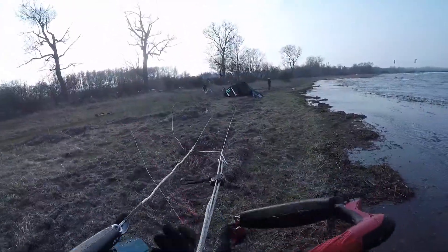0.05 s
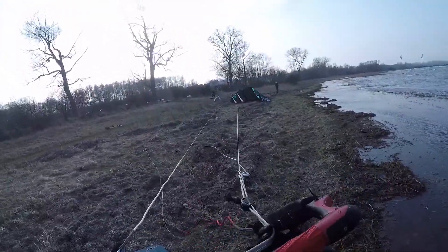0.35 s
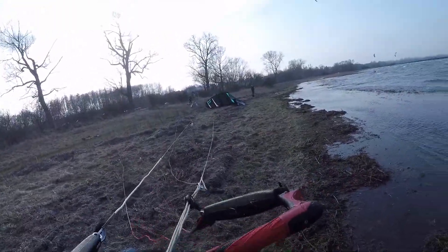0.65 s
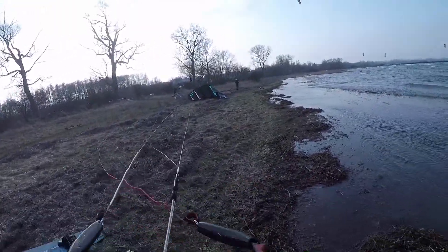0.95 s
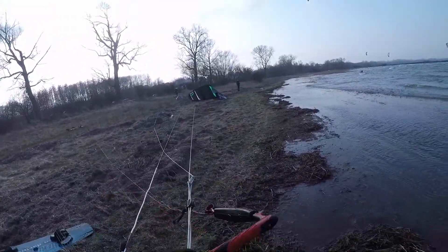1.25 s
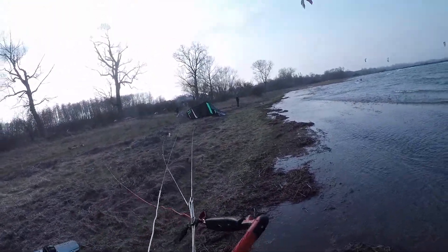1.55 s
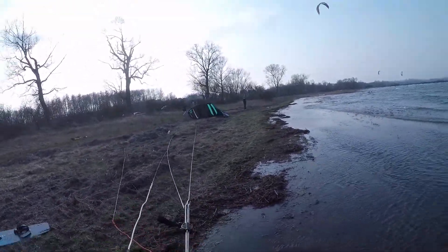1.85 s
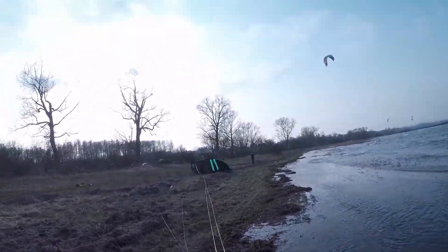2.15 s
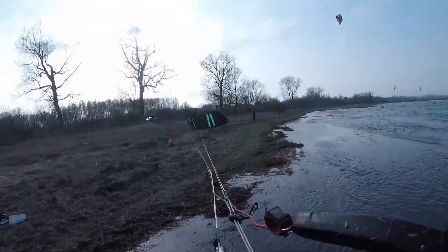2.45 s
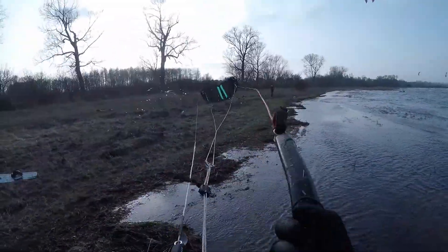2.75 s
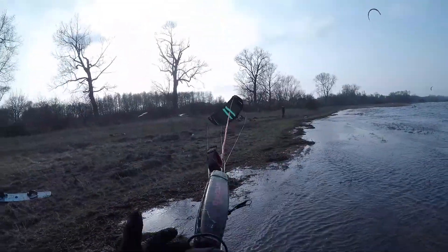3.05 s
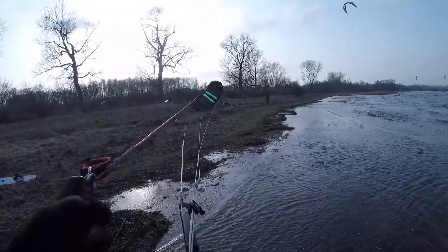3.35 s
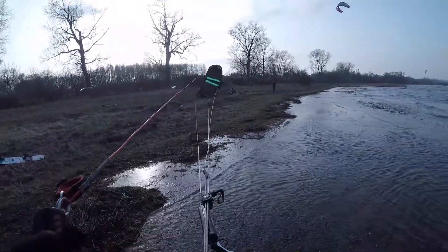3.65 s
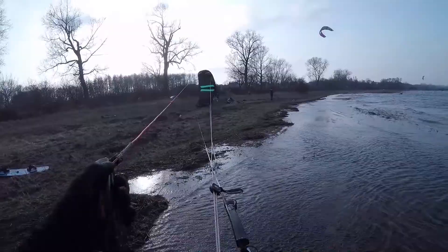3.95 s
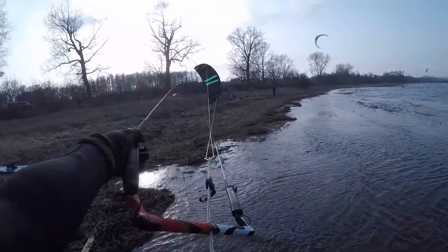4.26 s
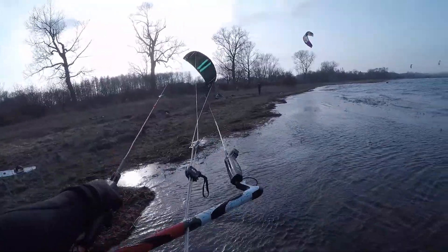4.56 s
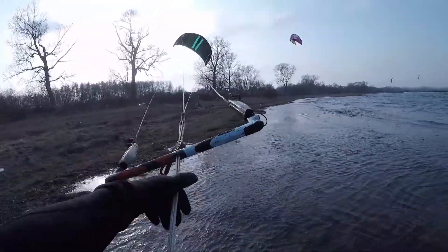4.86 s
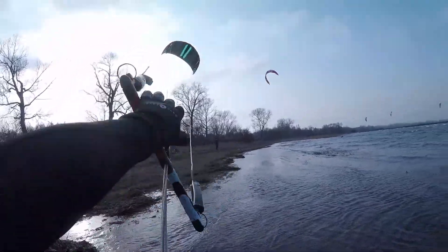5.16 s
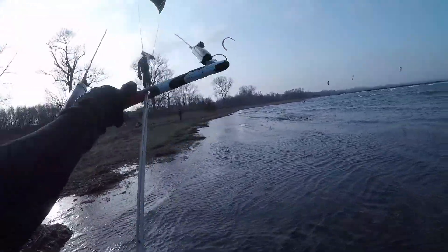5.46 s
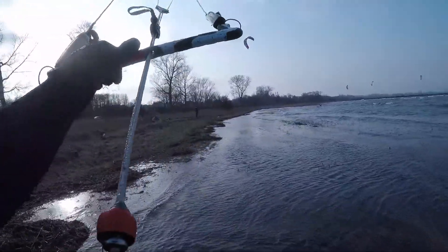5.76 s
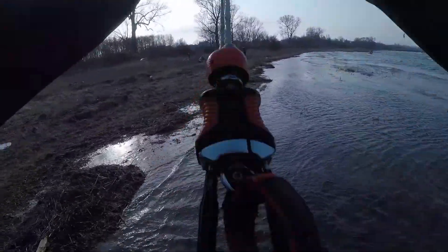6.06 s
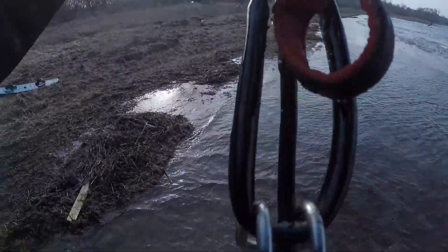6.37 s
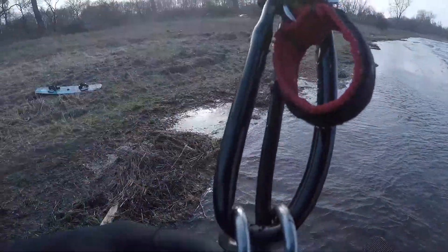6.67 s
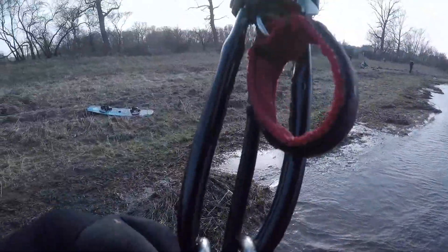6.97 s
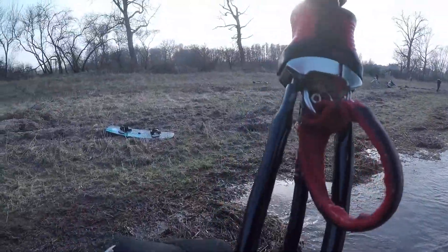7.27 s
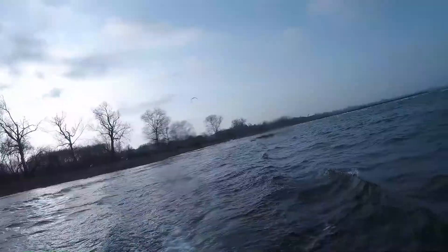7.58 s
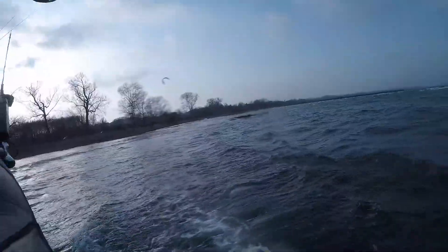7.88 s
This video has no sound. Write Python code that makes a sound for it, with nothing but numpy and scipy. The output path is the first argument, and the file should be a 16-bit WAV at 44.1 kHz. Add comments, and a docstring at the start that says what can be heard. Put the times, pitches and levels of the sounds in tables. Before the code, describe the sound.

Low wind buffets a body-worn microphone throughout, over a faint, steady wash of small lake waves. For the first two seconds, gusts thump amid light glove scrapes and small clicks of kite gear. The strongest gust hits at about 2.3 seconds with a knock and a scrape, and everything briefly dips in level. From 2.7 to 5.6 seconds, kite lines softly creak and rasp through the control bar while fittings and metal clasps tick. At 4.8 seconds the bar gives a sharp, loud click with a deep thud. Between 6.2 and 6.9 seconds a glove rubs the camera, with several dull knocks. The harness hook clicks sharply at 7 seconds, and its loop squeaks twice, briefly, around 7.3 and 7.5. At 7.6 seconds a sudden pop brings in fine spray off a board, which runs with the wind until the end, just after 8 seconds.

```python
"""Kitesurfer on a windy lake shore

Gusts buffet a body-worn camera's microphone over the wash of small waves. Lines rasp and creak on
the control bar, fittings click, a glove scrapes the housing and the harness loop squeaks on its hook.
The strongest gust makes the camera's gain duck. With a pop the scene cuts to a ride through spray."""
import sys
import numpy as np
from scipy import signal
from scipy.fft import rfft, irfft, next_fast_len
from scipy.io import wavfile
from scipy.ndimage import uniform_filter1d, minimum_filter1d

SR = 44100
rng = np.random.default_rng(int(sys.argv[2]) if len(sys.argv) > 2 else 0)


def store_pcm(level_fs):
    """Save levels as 16-bit WAV."""
    pcm = np.round(np.clip(level_fs, -1, 1) * 32767).astype(np.int16)
    wavfile.write(sys.argv[1], SR, np.atleast_2d(pcm).T)


N = 358091
T = np.arange(N) / SR
TOP_HZ = 15300  # upper edge of the camera's sound

# Levels are relative within each layer. Spectra are EQ curves for the raw sound.
# gusts thumping the microphone: peak t/s, length/s, level/dB
GUSTS = [(0.193, 0.096, -13), (0.844, 0.07, -10.5), (1.012, 0.041, -19), (1.217, 0.057, -10.5),
         (1.577, 0.047, -18.5), (1.684, 0.065, -13.5), (1.779, 0.034, -11), (2.14, 0.15, -15.5),
         (2.288, 0.068, 0), (2.676, 0.12, -5), (3.08, 0.076, -8), (3.256, 0.048, -10), (3.61, 0.062, -13),
         (4.004, 0.071, -14), (4.275, 0.063, -14), (4.92, 0.082, -16.5), (5.064, 0.067, -14.5),
         (5.235, 0.08, -13), (5.95, 0.035, -14.5), (6.253, 0.056, -15.5), (7.02, 0.1, -14.5),
         (7.17, 0.1, -21)]
# pressure swings of the breeze between gusts: t/s, level/dB
BREEZE_LEVEL = [(0, -16), (.35, -31.5), (.53, -35.5), (.74, -33.5), (1.0, -24), (2.2, -26), (2.47, -27),
                (2.8, -21.5), (3.5, -26), (3.82, -26.5), (4.1, -28.5), (5.3, -24), (6.7, -27.5), (7.6, -23),
                (8.05, -22)]
# turbulence at the housing as the body turns in the wind: t/s, level/dB
TURBULENCE_LEVEL = [(0, -33.5), (.72, -33), (1.2, -38.5), (1.65, -34), (1.95, -37), (2.2, -33.5),
                    (2.42, -37), (2.65, -34), (2.8, -34), (3.25, -35.5), (3.58, -35.5), (3.9, -42.5),
                    (4.35, -35), (4.65, -42), (5.1, -37.5), (5.85, -41.5), (6.15, -33.5), (6.4, -41.5),
                    (6.6, -33), (6.83, -48), (6.91, -31.5), (6.99, -47), (7.2, -38.5), (8.1, -50)]
# deep heave of large eddies, and rush of small ones: f/Hz, level/dB
HEAVE_SPECTRUM = [(4, 2.5), (12, -7), (25, 6.5), (34, -4), (43, -10.5), (58, -39), (120, -61)]
EDDY_SPECTRUM = [(35, -0.5), (60, 1), (85, 4), (130, -1.5), (200, -7), (320, -15), (520, -24.5),
                 (900, -29.5), (2000, -34.5), (4000, -59.5)]

# clicks of bar fittings, harness hook and buckles, and small metal line clasps:
# t/s, level/dB, contact time/ms, main mode boost/dB
BAR_CLICKS = [(1.220, -37.5, .1, -2), (3.065, -41, .15, 2), (3.218, -32, .15, 4), (3.397, -32, 0.072, -6),
              (3.569, -34, 0.18, 9), (4.645, -33, 0.063, 3), (4.7833, -14, 0.077, -9.5),
              (4.7856, -11.5, 0.12, 23), (4.7884, -21.5, 0.018, 2), (4.809, -33, .1, -8),
              (5.263, -40, .08, -10), (5.398, -34.5, .25, 7), (5.654, -35, .2, 12)]
HOOK_CLICKS = [(.390, -37, 0.25, -2), (1.509, -35, 0.54, -2), (1.825, -31.5, 0.44, -8),
               (2.655, -30, 0.058, -12), (5.1995, -27.5, 0.62, -2), (7.0003, -22.5, 0.02, -20),
               (7.0012, -14.5, 0.2, 6), (7.224, -25, 0.5, 9)]
CLASP_CLICKS = [(2.164, -45, .04, 6), (2.215, -38, .06, 9), (2.656, -33, 0.12, 16), (4.523, -42.5, .02, -6),
                (4.848, -34, .02, 0), (5.232, -42, .12, -5), (5.419, -42, .1, -5), (5.479, -39, .06, 3),
                (6.926, -51, .02, -8), (7.068, -45, .1, -1), (7.191, -39, .12, -1), (7.242, -49, .1, -2)]
# how each of those parts rings, main mode first: f/Hz, level/dB, t60/s
BAR_MODES = [(2156, 9, 0.016), (482, 2.5, 0.0044), (1090, -19, 0.045), (3400, 3, 0.017), (3850, -3, 0.013),
             (4860, -7.5, 0.011), (5300, -22, 0.011)]
HOOK_MODES = [(1990, 3, 0.013), (1460, 3, 0.021), (2150, -6, 0.024), (3120, -3, 0.012), (3720, -2, 0.017),
              (4470, -4.5, 0.014), (5740, -10, 0.012)]
CLASP_MODES = [(3500, 5, .011), (4570, -1, 0.014), (5300, -1, 0.011), (5740, -15, 0.01), (8300, -3, 0.0098)]
# soft knocks on the camera and harness: t/s, f/Hz, level/dB, t60/s
KNOCKS = [(2.275, 152, -7, 0.025), (4.803, 36.4, -2, 0.28), (5.767, 1110, -32, .024),
          (6.215, 446, -21.5, 0.019), (6.2165, 104, -3, 0.027), (6.501, 218, -22.5, 0.015),
          (6.501, 855, -33.5, 0.038), (6.893, 74, -14.5, 0.15), (7.545, 473, -34, .063)]

# glove and sleeve brushing the housing: t/s, length/s, level/dB, rumble/dB, rub f/Hz
SCRAPES = [(0.372, 0.048, -45, 4, 1600), (1.191, 0.062, -47, 5, 1500), (1.602, 0.086, -43.5, 8, 1410),
           (1.693, 0.058, -47, 6.5, 1190), (1.82, 0.023, -47, 11, 1550), (2.245, 0.087, -36.5, 4.5, 1500),
           (2.264, 0.025, -31, 9, 1330), (2.285, 0.016, -25.5, 5, 1520), (2.313, 0.058, -38.5, 3.5, 1300),
           (2.402, 0.08, -42, -2, 1320), (2.648, 0.059, -37, 2.5, 1460), (3.942, 0.068, -54, 10, 1440),
           (4.928, 0.053, -47.5, 6, 1400), (5.188, 0.032, -45, -3, 1580), (5.51, 0.12, -48, 9, 1500),
           (6.177, 0.16, -45, -6, 2270), (6.211, 0.053, -33, -14, 1590), (6.249, 0.068, -40.5, -23, 1900),
           (6.29, 0.12, -41, -23, 1750), (6.459, 0.17, -43.5, -3, 1450), (6.862, 0.099, -43.5, -5, 1280),
           (6.895, 0.076, -44, -7, 1890)]
# body of the dragging fabric, and bright fizz of a quick rub: f/Hz, level/dB
FABRIC_SPECTRUM = [(150, -15), (500, -17), (950, -2), (1550, 3.5), (2250, -3), (2900, -13.5), (3600, -21.5),
                   (5200, -10.5), (7000, -26), (10000, -27), (15000, -55)]
FIZZ_SPECTRUM = [(2400, 10), (3500, 5), (5300, 3.5), (6400, -5), (7500, -14.5), (9500, -13.5), (13500, -26)]
# harness loop squeaks: t/s, length/s, rise/s, slip f/Hz after the rise, final slip f/Hz, level/dB
SQUEAKS = [(7.279, 0.068, 0.0123, 1140, 1175, -39), (7.463, 0.064, 0.038, 1514, 1080, -44)]
# resonances a squeak sounds through: f/Hz, level/dB
SQUEAK_SPECTRUM = [(1100, 0), (1500, -2), (1900, -9), (2250, -4.5), (2850, -14), (3450, -11.5), (4100, -24),
                   (4500, -24), (6000, -46)]
# taut lines creaking on the bar, and pulls of line through it: t/s, length/s, level/dB
LINE_CREAKS = [(2.751, 0.031, -43.5), (2.802, 0.078, -46), (2.94, 0.026, -44.5), (3.015, 0.021, -40),
               (3.065, 0.019, -43), (3.089, 0.032, -46), (3.18, 0.437, -50.5), (5.403, 0.07, -50),
               (5.513, 0.11, -51.5)]
LINE_PULLS = [(2.19, 0.084, -52), (2.958, 0.91, -55), (3.27, 0.29, -61), (4.592, 0.071, -56),
              (4.7, 0.63, -57), (5.094, 0.12, -55)]
# tone of a creaking line, and of a sliding one: f/Hz, level/dB
CREAK_SPECTRUM = [(900, -38), (1600, 3), (2000, -3), (2230, 10), (2550, -21), (3400, -21), (5000, -25)]
RASP_SPECTRUM = [(900, -11), (1800, -10), (2050, -9), (2220, -4), (2450, -3.5), (2900, -13), (3450, 1),
                 (4100, -15.5), (4900, -4.5), (5600, -7.5), (7000, -43), (12000, -27)]

# spray off the board, wash of the waves, and fine, even hiss: f/Hz, level/dB
SPRAY_SPECTRUM = [(280, 16), (600, 7), (1200, 12), (2250, 8), (2850, -7.5), (3450, 6.5), (4100, -4),
                  (4900, -4.5), (7000, -19), (10000, -18), (15000, -33)]
WASH_SPECTRUM = [(200, -6), (450, 1), (780, -9), (1130, -1.5), (1350, -3), (1650, -1.5), (2000, -7.5),
                 (2250, -3.5), (2500, -13.5), (2950, -18), (3400, -6.5), (4100, -17.5), (5000, -17),
                 (7000, -29.5), (12000, -47)]
HISS_SPECTRUM = [(2000, -19), (5000, -3), (7000, -2.5), (8800, 4), (10500, 1), (12000, -4.5), (13700, -7),
                 (15500, -35)]
# slow swell of the wash: t/s, level/dB
WASH_LEVEL = [(0, -54.5), (.4, -54), (2.2, -54), (2.85, -52), (3.55, -51), (5.2, -51.5), (7.1, -54),
              (8.1, -55.5)]


def wind(gust_db=2, breeze_db=5, lull_db=2.5, swirl_db=-16, eddy_db=0.64, torn_db=-30, flutter_db=0.98):
    """Large eddies heave the pressure, hardest in the gusts; small ones tear off with each heave."""
    gust = undb(gust_db) * gusts()
    breeze = follow(BREEZE_LEVEL) * undb(breeze_db + lull_db * walk(11))
    strength = np.hypot(gust, breeze)
    heave = steady(colour(noise(), HEAVE_SPECTRUM), 0.04) * gust
    heave += steady(colour(noise(), HEAVE_SPECTRUM), 0.2) * breeze
    # a harder gust also drives quicker swirls, which thud
    swirl = steady(colour(noise(), [(42, -0.5), (60, 0), (90, -13.5), (150, -22)]), 0.015)
    swirl *= strength * np.sqrt(np.minimum(strength, .3))
    eddies = steady(colour(noise(), EDDY_SPECTRUM), 0.043)
    eddies *= np.exp(0.25 * heave / strength) * undb(flutter_db * walk(30))
    turbulence = np.hypot(undb(eddy_db) * follow(TURBULENCE_LEVEL), undb(torn_db) * strength)
    return heave + undb(swirl_db) * swirl + unit(eddies) * turbulence


def gusts(release_ratio=1.1):
    """Gust envelope: bell-shaped swells that build a little faster than they die."""
    out = np.zeros(N)
    for s, length, db in GUSTS:
        half_width = length / 2 * np.where(T < s, 1, release_ratio)
        out += undb(db) * np.exp(-((T - s) / half_width) ** 2)
    return out


def fittings():
    """The bar, the hook and the line clasps click, each with its own ring."""
    return (clicks(BAR_CLICKS, BAR_MODES, crack_db=-16, crack_hz=6960)
            + clicks(HOOK_CLICKS, HOOK_MODES, crack_db=-14.5, crack_hz=14000)
            + clicks(CLASP_CLICKS, CLASP_MODES, crack_db=-9, crack_hz=8000))


def clicks(rows, modes, crack_db, crack_hz, crack_s=0.0036):
    """Hard parts snap together; a longer contact is duller, a free rebound lets the main mode sing."""
    out = np.zeros(N)
    hz, mode_db, t60 = np.transpose(modes)
    lowpass = signal.butter(2, crack_hz, fs=SR)
    for s, db, contact_ms, boost_db in rows:
        gain = undb(mode_db + boost_db * (hz == hz[0])) / (1 + (2e-3 * hz * contact_ms) ** 2)
        gain *= undb(db) / np.linalg.norm(gain)
        for k in range(len(hz)):
            add(out, s, (-1) ** k * gain[k] * ring(hz[k], t60[k]))
        crack = rng.standard_normal(500) * np.exp(-np.arange(500) / SR / crack_s)
        hardness = np.exp(-contact_ms / 0.06)  # only hard contacts give a bright crack
        add(out, s, undb(db + crack_db) * hardness * signal.lfilter(*lowpass, crack))
    return out


def knocks(attack_cycles=0.071):
    """Soft contacts thud: one damped tone with a rounded attack."""
    out = np.zeros(N)
    for s, hz, db, t60 in KNOCKS:
        thud = ring(hz, t60)
        cycles = np.arange(len(thud)) * hz / SR
        add(out, s, -undb(db) * thud * (1 - np.exp(-cycles / attack_cycles)))
    return out


def glove_scrapes(rough_db=2.5, rub_db=4, rub_q=1.9, fizz_db=-18, fizz_db_per_octave=22):
    """Fabric drags in dense, resonant slips and the housing rumbles; a higher rub fizzes more."""
    chatter = undb(rough_db * walk(220))
    slips = colour(grains(rate=9000, spread_db=3.5), FABRIC_SPECTRUM) * chatter
    fizz = colour(noise(), FIZZ_SPECTRUM) * chatter
    rumble = colour(noise(), [(70, 12.5), (150, 7), (400, -6), (900, -6.5)])
    out = np.zeros(N)
    for s, length, db, rumble_db, hz in SCRAPES:
        rub = unit(signal.lfilter(*signal.iirpeak(hz, rub_q, fs=SR), slips))
        brightness = undb(fizz_db + fizz_db_per_octave * np.log2(hz / 1600))
        scrape = unit(slips + undb(rub_db) * rub) + brightness * fizz + undb(rumble_db) * rumble
        add(out, s, undb(db) * stroke(scrape, s, length, taper=0.64))
    return out


def harness_squeaks(start_hz=886, rough_db=3.2, wobble=.015, jitter=.018):
    """The wet loop sticks and slips on the steel hook; pitch climbs with load, then holds or sags."""
    out = np.zeros(N)
    for s, length, rise_s, risen_hz, final_hz, db in SQUEAKS:
        slip_hz = np.interp(T, [s, s + rise_s, s + length], [start_hz, risen_hz, final_hz])
        slip_hz *= 1 + wobble * walk(170) + jitter * walk(1500)
        phase = 2 * np.pi * np.cumsum(slip_hz) / SR
        tone = colour(sum(np.sin(k * phase) for k in range(1, 6)), SQUEAK_SPECTRUM)
        tone *= undb(rough_db * walk(120))
        add(out, s, undb(db) * unit(stroke(tone, s, length, taper=0.32)))
    return out


def line_creaks(catch_db=3):
    """A taut line sticks and lets go in uneven bursts of small ticks."""
    ticks = colour(grains(rate=480, spread_db=4), CREAK_SPECTRUM) * undb(catch_db * walk(45))
    out = np.zeros(N)
    for s, length, db in LINE_CREAKS:
        add(out, s, undb(db) * unit(stroke(ticks, s, length, taper=0.16)))
    return out


def line_rasp(catch_db=1):
    """Braided lines rasp through the bar with each pull, catching and slipping."""
    rasp = colour(grains(rate=6900, spread_db=4), RASP_SPECTRUM) * undb(catch_db * walk(49))
    out = np.zeros(N)
    for s, length, db in LINE_PULLS:
        add(out, s, undb(db) * stroke(rasp, s, length, taper=0.62))
    return out


def cut_to_ride(cut_s=7.6075, spray_db=-46, pop_db=-15, pop_decay_s=0.022):
    """A sharp pop as the scene cuts abruptly to the ride, then fine spray off the board."""
    spray = undb(spray_db) * colour(grains(rate=8200, spread_db=3.5), SPRAY_SPECTRUM)
    pop = undb(pop_db) * np.exp(-np.maximum(T - cut_s, 0) / pop_decay_s)
    return (T >= cut_s) * (spray + pop)


def waves(wash_db=4, bubble_db=-12, drop_db=-13, lap_db=1.5, foam_db=2.1, hiss_db=-65):
    """Wavelets break in a lapping wash of foam, bubbles and single drops, over a smooth hiss."""
    water = noise() + undb(bubble_db) * bubbles() + undb(drop_db) * grains(rate=60, spread_db=0)
    wash = colour(water, WASH_SPECTRUM) * undb(lap_db * walk(20))
    foam = signal.sosfiltfilt(signal.butter(4, 2800, "high", fs=SR, output="sos"), wash)
    wash = wash - foam + foam * undb(foam_db * walk(12))  # the bright foam swells on its own
    hiss = undb(hiss_db) * colour(noise(), HISS_SPECTRUM)
    return undb(wash_db) * wash * follow(WASH_LEVEL) + hiss


def bubbles(count=6000, lowest_hz=700, octaves=2.42, cycles=14):
    """Small bubbles ring briefly and rise in pitch."""
    out = np.zeros(N)
    for when, pitch, softness in rng.random((count, 3)):
        hz = lowest_hz * 2 ** (octaves * pitch)
        add(out, when * T[-1], undb(-12 * softness) * ring(hz, cycles / hz, glide=0.062))
    return unit(out)


def gain_control(x, ceiling=0.88, hold_s=0.32, recover_db_per_s=8.5, start_cut_db=4.5):
    """A peak over the ceiling ducks the gain at once; it holds, then climbs back steadily."""
    over_db = np.maximum(20 * np.log10(np.abs(x) / ceiling + 1e-9), 0)
    half = int(hold_s * SR / 2)
    held_db = -minimum_filter1d(-over_db, 2 * half + 1, origin=half, mode="constant")
    climb_db = recover_db_per_s * T
    cut_db = np.maximum.accumulate(np.maximum(held_db + climb_db, start_cut_db)) - climb_db
    return x * undb(-uniform_filter1d(cut_db, 221))  # smoothed over 5 ms


def undb(db):
    """Decibels to gain."""
    return 10 ** (np.asarray(db) / 20)


def unit(x):
    """Scale to rms 1."""
    return x / np.sqrt(np.mean(x ** 2))


def follow(curve):
    """Gain envelope from rows of t/s, level/dB."""
    return undb(np.interp(T, *np.transpose(curve)))


def colour(x, points):
    """EQ by rows of f/Hz, level/dB, falling 20 dB an octave beyond the ends; rms 1."""
    hz, db = np.transpose(points)
    size = next_fast_len(len(x))
    octave = np.log2(np.arange(size // 2 + 1) * SR / size + .5)
    knots = np.log2(hz)
    outside = np.abs(octave - np.clip(octave, knots[0], knots[-1]))
    gain = undb(np.interp(octave, knots, db) - 20 * outside)
    return unit(irfft(rfft(x, size) * gain, size)[:len(x)])


def noise():
    """White noise."""
    return rng.standard_normal(N)


def walk(rate):
    """Random wander through `rate` points a second; rms 1."""
    return unit(np.interp(T * rate, np.arange(N), noise()))


def steady(x, seconds):
    """Even out the swells of a noise that last longer than `seconds`."""
    power = np.abs(signal.hilbert(x, next_fast_len(N))[:N]) ** 2
    return unit(x / np.sqrt(uniform_filter1d(power, int(seconds * SR) + 1, mode="nearest") + 1e-9))


def grains(rate, spread_db):
    """About `rate` tiny impacts a second; with spread, most are weak and a few strong."""
    impacts = (rng.random(N) < rate / SR) * np.sign(noise())
    return unit(impacts * undb(spread_db * np.minimum(rng.exponential(size=N), 5)))


def ring(hz, t60, glide=0):
    """A decaying sine whose pitch may rise as it dies."""
    t = np.arange(int(t60 * SR) + 2) / SR
    return np.sin(2 * np.pi * hz * t * (1 + .5 * glide * t / t60)) * np.exp(-np.log(1000) * t / t60)


def stroke(x, s, length, taper):
    """Cut a stretch out of a steady sound; the share `taper` of it fades in and out."""
    part = x[int(s * SR):int((s + length) * SR)]
    return part * signal.windows.tukey(len(part), taper)


def add(out, s, x):
    """Mix x into out at time s."""
    i = int(s * SR)
    out[i:i + len(x)] += x[:max(N - i, 0)]


def scene():
    """Shore, gear and the closing ride, mixed in mono."""
    shore = wind() + waves()
    gear = line_rasp() + line_creaks() + glove_scrapes() + fittings() + knocks() + harness_squeaks()
    return (shore + gear + cut_to_ride())[None]


def record(dry):
    """The camera ducks on the loudest peaks and cuts the top end."""
    lowpass = signal.ellip(8, .2, 70, TOP_HZ, fs=SR, output="sos")
    return signal.sosfilt(lowpass, gain_control(dry[0]))[None]


dry = scene()
out = record(dry)
store_pcm(out)
```